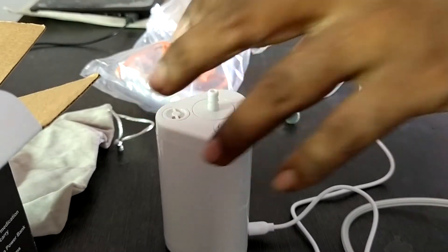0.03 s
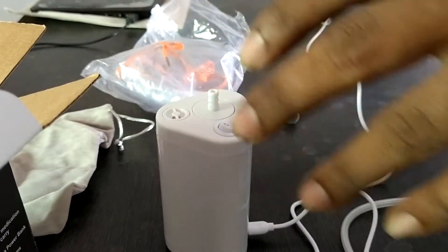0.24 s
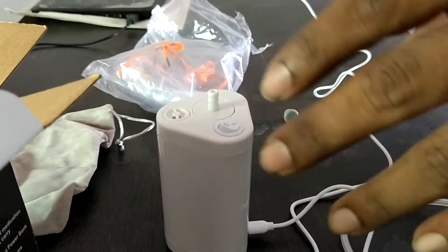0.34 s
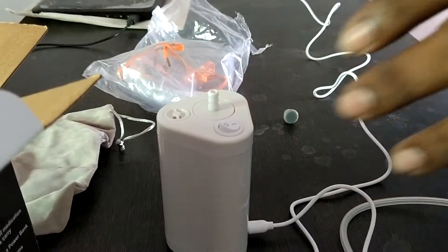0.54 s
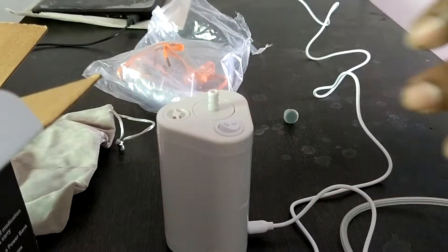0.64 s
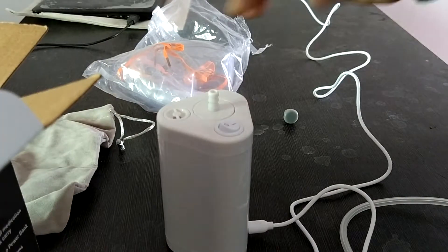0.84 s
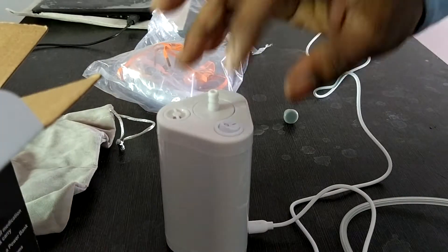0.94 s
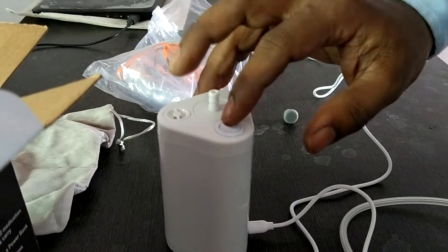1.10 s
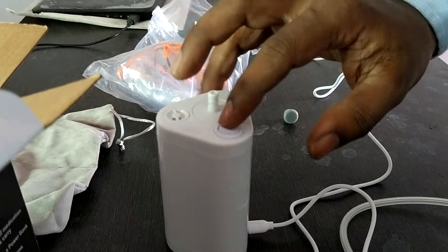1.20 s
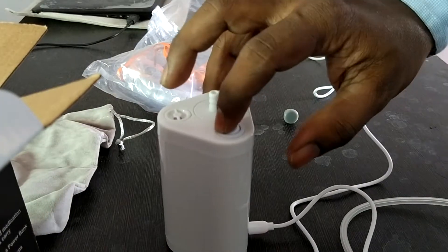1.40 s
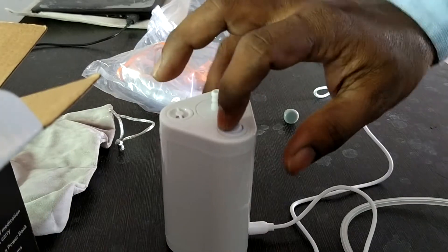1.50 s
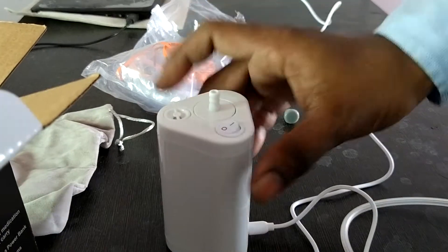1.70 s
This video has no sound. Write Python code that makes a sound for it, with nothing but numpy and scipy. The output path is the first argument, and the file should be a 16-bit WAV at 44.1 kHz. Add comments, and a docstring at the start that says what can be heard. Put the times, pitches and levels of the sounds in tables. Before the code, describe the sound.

Compact compressor close to the microphone in a hard, echoing room: quiet rumble and rustle, a loud snap, a quick motor start, about a second of buzzing, pulsing airflow, then a crisp click and fast wind-down.

```python
"""Small compressor in a bare room

A small compressor on a table in a bare, echoing room: a sharp snap rings out, then the motor spins up. It hums
at multiples of its shaft speed and blows pulsing air, then the button clicks and it coasts down. Hum, thin high
and low tones and rings are sine waves; air, rumble, rustle and clicks are coloured noise. The walls' answer is
fading noise; left and right have unlike treble, and the treble falls away steeply near 12 kHz."""
import sys
import numpy as np
from scipy import signal
from scipy.fft import rfft, irfft, next_fast_len
from scipy.io import wavfile
from scipy.ndimage import map_coordinates

SR = 44100
rng = np.random.default_rng(int(sys.argv[2]) if len(sys.argv) > 2 else 0)


def volts_from_decibels(level):
    """Turn decibel levels (scalar or array-like) into linear amplitude factors."""
    exponent = np.asarray(level, float) / 20
    return 10 ** exponent


def to_wav(sig):
    """Store sig (one row per channel, or 1-D mono) as 16-bit WAV at the path in sys.argv[1].

    Samples outside -1..1 are clipped; the rate is SR.
    """
    pcm = np.clip(np.atleast_2d(sig), -1, 1) * 32767
    pcm = np.round(pcm).astype(np.int16)
    wavfile.write(sys.argv[1], SR, pcm.T)  # frames by channels


N = 77175


def unit(x):
    """Scales a sound to an rms of 1."""
    return x / np.sqrt(np.mean(x ** 2) + 1e-20)


def along(points, hz):
    """Reads a curve of (Hz, value) points, with pitch on a log axis."""
    point_hz, value = np.transpose(points)
    return np.interp(np.log(hz + 1), np.log(point_hz + 1), value)


def curves(rows):
    """Turns each column after the time into one value per sample."""
    time_s, *columns = np.transpose(rows)
    return [np.interp(np.arange(N) / SR, time_s, column) for column in columns]


def wobble(rate):
    """A smooth random curve through a given number of random points a second."""
    knots = rng.standard_normal(int(N * rate / SR) + 4)
    return map_coordinates(knots, [np.arange(N) * rate / SR])


def filtered(x, response):
    """Multiplies the spectrum of a sound by a response that depends on frequency."""
    size = next_fast_len(N + SR // 2)
    spectrum = rfft(x, size) * response(np.fft.rfftfreq(size, 1 / SR))
    return irfft(spectrum, size)[..., :N]


def rush(tone):
    """Stereo noise of rms 1: left and right share nearly the same bass but unrelated treble."""
    # How alike left and right are: pitch_hz, likeness (1 = same, 0 = unrelated)
    likeness = [(60, 0.78), (130, 0.984), (290, 0.92), (640, 0.187), (1400, 0), (15000, 0)]

    def middle_and_side(hz):
        angle = np.arccos(np.clip(along(likeness, hz), -1, 1)) / 2
        return volts_from_decibels(along(tone, hz)) * [np.cos(angle), np.sin(angle)]

    mid, side = filtered(rng.standard_normal((2, N)), middle_and_side)
    return unit(np.array([mid + side, mid - side]))


def walls(x):
    """After a short gap the walls answer with noise in which each frequency dies at its own speed."""
    # How long the echo takes to fall by 60 dB: pitch_hz, fall_s
    echo_fall = [(300, 0.59), (1000, 0.85), (3000, 0.91), (8000, 0.77), (12000, 0.5), (15000, 0.29)]
    first_wall_s, fade_in_s, grain_db = 0.0041, 0.0018, 2.5
    hz, t, bins = signal.stft(rng.standard_normal((2, SR)), SR, nperseg=256)
    fading = volts_from_decibels(-60 * t / along(echo_fall, hz)[:, None])
    tail = signal.istft(bins * fading, SR, nperseg=256)[1]
    length = tail.shape[1]
    tail *= np.clip((np.arange(length) / SR - first_wall_s) / fade_in_s, 0, 1)
    tail *= volts_from_decibels(grain_db * wobble(249.6)[:length])  # an uneven answer
    return signal.fftconvolve(x, tail / np.linalg.norm(tail[0]), axes=1)[:, :N]


def click(bursts, tone, room_db):
    """Short bursts of coloured noise; the walls answer one pulse of the same colour."""
    t = np.arange(N) / SR
    dry = 0
    for peak_s, level_db, rise_s, fall_s in bursts:
        rising = np.minimum((peak_s - t) / rise_s, 9) ** 2
        shape = np.exp(-np.where(t < peak_s, rising, (t - peak_s) / fall_s))
        burst = unit(shape * rush(tone)) * np.sqrt(np.mean(shape ** 2))
        dry = dry + volts_from_decibels(level_db) * burst
    dry = filtered(dry, lambda hz: hz > tone[0][0])  # nothing below the first pitch of the tone
    pulse = np.zeros((2, N))
    pulse[:, round(bursts[0][0] * SR)] = 1
    pulse = unit(filtered(pulse, lambda hz: volts_from_decibels(along(tone, hz))))
    return dry + volts_from_decibels(room_db) * walls(pulse)


def ring(modes):
    """Sine waves that each start at full level and die away, alike in left and right."""
    t = np.arange(N) / SR
    total = 0
    for start_s, pitch_hz, level_db, fall_s in modes:
        since = np.maximum(t - start_s, 0)
        total = total + volts_from_decibels(level_db - 60 * since / fall_s) * np.sin(2 * np.pi * pitch_hz * since)
    return total


def room():
    """Rumble and a faint rustle are coloured noise; thin tones are sine waves of uneven level."""
    # Colour of the rumble: pitch_hz, relative level_db (per Hz)
    rumble_tone = [(15, -60), (30, -50), (50, -31), (75, -6), (100, -11), (170, -9.5), (270, -3.5),
                   (400, -6.5), (560, -14.5), (800, -13.5), (1160, -15.5), (1800, -25.5), (2700, -21.5),
                   (4000, -33.5), (5600, -31), (6100, -21.5), (7900, -34), (9400, -26.5), (12000, -35),
                   (13000, -33), (16000, -60)]
    # Loudness of the rustle: time_s, level_db
    rustle_level = [(0, -53.5), (.08, -56), (.12, -48), (.17, -50.5), (.23, -53), (.5, -73), (1.75, -79.5)]
    # Colour of the rustle: pitch_hz, relative level_db (per Hz)
    rustle_tone = [(800, -7), (1500, -1), (5000, -11), (11900, -18), (12200, -40)]
    # Thin tones of fixed pitch: pitch_hz, left_db, right_db (rms, before the unevenness)
    thin_tones = [(50, -69, -69), (101, -61, -61), (404, -60, -62), (3004, -70, -68), (8441, -68, -70),
                  (9286, -63, -69), (13750, -70, -70)]
    rumble_db, rumble_uneven_db, tone_uneven_db = -47, 1.2, 3.2
    t = np.arange(N) / SR
    tones = 0
    for pitch_hz, left_db, right_db in thin_tones:
        level = np.sqrt(2) * volts_from_decibels([[left_db], [right_db]] + tone_uneven_db * wobble(15.17))
        tones = tones + level * np.sin(2 * np.pi * pitch_hz * t + 1.36 * wobble(45))
    rumble = volts_from_decibels(rumble_db + rumble_uneven_db * wobble(8.0)) * rush(rumble_tone)
    rustle = volts_from_decibels(curves(rustle_level)[0]) * rush(rustle_tone)
    return rumble + rustle + tones


def blurred_tone():
    """A thin 6 kHz sine wave, blurred by a wandering phase; its level comes and goes."""
    # Loudness on the right: time_s, right_db (rms, before the unevenness)
    tone_level = [(0, -57), (.1, -47), (.15, -67), (.22, -47), (.45, -49.5), (.6, -57), (.75, -50),
                  (.87, -56), (.95, -58), (1.05, -52), (1.12, -59.5), (1.2, -53), (1.37, -62), (1.45, -55),
                  (1.6, -66), (1.64, -55.5), (1.75, -57)]
    pitch_hz, blur_rad, uneven_db = 6007, 1.1, 2
    left_under_right_db = -8
    tone = np.sin(2 * np.pi * pitch_hz * np.arange(N) / SR + blur_rad * wobble(60))
    level_db = curves(tone_level)[0] + uneven_db * wobble(29.65) + [[left_under_right_db], [0]]
    return np.sqrt(2) * volts_from_decibels(level_db) * tone


def ticks():
    """Two faint ticks ahead of the snap: short bursts of mostly high noise."""
    # Bursts: peak_s, level_db, rise_s, fall_s
    tick_bursts = [(.097, -51, 0.0029, 0.0052), (.15, -43.5, 0.0029, 0.0043)]
    # Colour: pitch_hz, relative level_db (per Hz)
    tick_tone = [(3000, -35), (7500, -12), (8800, 3), (9400, -8), (10200, -11.5), (12000, -9), (14000, -30)]
    return click(tick_bursts, tick_tone, room_db=-90)


def snap():
    """A sharp snap: noise bursts, a hollow body that rings, and a strong answer from the walls."""
    # Bursts: peak_s, level_db, rise_s, fall_s
    snap_bursts = [(.2379, -14, 0.00228, 0.00025), (.2392, -9, 0.00062, 0.0005),
                   (.242, -29, 0.0026, 0.0066)]
    # Colour: pitch_hz, relative level_db (per Hz)
    snap_tone = [(150, -36), (300, -7), (450, -21), (700, -7), (1000, -15), (1300, -9), (1650, -1.5),
                 (2100, -11.5), (2700, -2.5), (3200, -7.5), (3600, -5), (4500, -11), (5500, -6.5),
                 (6500, -5.5), (8000, -5), (10000, -3), (12000, 2.5), (14000, -11), (16000, -14)]
    # Ringing of the hollow body: start_s, pitch_hz, level_db, fall_s (time to fall 60 dB)
    hollow_body = [(.2372, 384, -47, .025), (.2372, 700, -28.5, 0.019), (.2368, 1900, -45, 0.005)]
    return click(snap_bursts, snap_tone, room_db=-37.5) + ring(hollow_body)


def button():
    """The button's click: noise bursts and the short, high ringing of its plastic cap."""
    # Bursts: peak_s, level_db, rise_s, fall_s
    button_bursts = [(1.4150, -15, 0.0006, 0.0004), (1.4159, -13, 0.0003, 0.0005),
                     (1.4175, -24, 0.0005, 0.0018)]
    # Colour: pitch_hz, relative level_db (per Hz)
    button_tone = [(1000, -53), (1850, -24), (2150, -2.5), (4600, -7.5), (5250, -10), (5900, -13),
                   (7500, 0.5), (9500, -6), (12000, 4), (14000, -6), (16000, -40)]
    # Ringing of the plastic cap: start_s, pitch_hz, level_db, fall_s (time to fall 60 dB)
    plastic_cap = [(1.4148, 2160, -35, .012), (1.4148, 3040, -25, 0.015), (1.4148, 3500, -33, 0.0172),
                   (1.4152, 5100, -31, 0.0096), (1.4152, 7700, -21, 0.0096), (1.4155, 11000, -12, .008)]
    return click(button_bursts, button_tone, room_db=-51.5) + ring(plastic_cap)


def motor_hum(speed, hum_db, turns):
    """Sine waves at multiples of the shaft speed; off full speed the higher ones fade more."""
    # Tones: multiple of the shaft speed, left_db, right_db (rms at full speed, before the case)
    hum_orders = [(3, -52, -50), (4, -39.5, -42.5), (5, -54, -59), (6, -71, -66), (7, -64, -59),
                  (8, -56, -52.5), (10, -70, -71), (11, -62, -63), (12, -62, -61), (14, -67, -66),
                  (15, -68, -59), (16, -61, -60), (17, -74, -69), (18, -67, -64), (19, -65, -69),
                  (20, -59, -61), (21, -61, -61), (22, -66, -68), (23, -68, -62), (24, -57, -57),
                  (25, -60, -63), (27, -58, -59), (30, -60, -61), (31, -57, -56), (33, -60, -62),
                  (34, -61, -64), (35, -60, -68), (36, -64, -69), (37, -59, -63), (38, -65, -69),
                  (41, -70, -68)]
    # What the case lets out, very little of the lowest tones: pitch_hz, gain_db
    case_gain = [(150, -30), (230, -2), (245, 0), (300, 0)]
    waver_db, left_lag_s = .3, .00005  # the waver grows with the log of the multiple
    lag = 2 * np.pi * speed * left_lag_s * [[1], [0]]
    hum = 0
    for order, left_db, right_db in hum_orders:
        waver = waver_db * np.log(order) * wobble(12.16)
        fade = hum_db * (0.5 + .03 * order)
        level = np.sqrt(2) * volts_from_decibels([[left_db], [right_db]] + waver + fade)
        hum = hum + level * np.sin(order * (turns - lag) + rng.uniform(0, 2 * np.pi))
    return filtered(hum, lambda hz: volts_from_decibels(along(case_gain, hz)))


def blown_air(turns):
    """Coloured noise whose strength pulses with the piston, in step with the shaft."""
    # Strength of the airflow: time_s, relative level_db
    airflow = [(.4, -45), (.45, -8), (.49, -1), (.54, 3), (1.415, 2.5), (1.45, -5.5), (1.52, -12),
               (1.62, -25)]
    # Colour: pitch_hz, relative level_db (per Hz)
    air_tone = [(200, -42), (350, -39), (700, -43.5), (1500, -20), (2000, -8), (2330, -32), (2550, -4.5),
                (2900, -16.5), (3600, -21.5), (5500, -22.5), (6300, -35.5), (7000, -9), (7500, -17.5),
                (7950, 5.5), (8400, -2), (9000, -12.5), (9700, -9), (11000, -9.5), (12000, -9),
                (13000, -15.5), (14000, 0.5), (14800, -28.5), (16000, -46)]
    # Pulsing: times a turn, depth (share of the level)
    puffs = [(1, .05), (3, .06), (4, .16)]
    air_db = -41
    pulsing = 1 + sum(depth * np.cos(round(times) * turns) for times, depth in puffs)
    level = volts_from_decibels(air_db + curves(airflow)[0] + 0.32 * wobble(6.2))
    return level * pulsing * rush(air_tone)


def compressor():
    """One unsteady shaft drives both the hum and the pulsing air, and both fill the room."""
    # Spin-up and coasting down: time_s, turns per s, hum_db (scaled for each tone of the hum)
    shaft = [(.44, 55, -34), (.465, 63, -13), (.49, 71.5, -4), (.52, 77.5, -2), (.55, 80.6, 0),
             (.6, 81.78, 0), (1.418, 81.78, 0), (1.44, 68, -6), (1.47, 58, -8), (1.5, 48, -11),
             (1.56, 33, -28)]
    slow_share, fast_share = .001, .0022  # unsteadiness as a share of the speed
    air_room_db, hum_room_db = -7, -21
    speed, hum_db = curves(shaft)
    unsteady = 1 + slow_share * wobble(13.85) + fast_share * wobble(89.1)
    turns = 2 * np.pi * np.cumsum(speed * unsteady) / SR  # shaft angle in radians
    hum = motor_hum(speed, hum_db, turns)
    air = blown_air(turns)
    return hum + air + walls(volts_from_decibels(air_room_db) * air + volts_from_decibels(hum_room_db) * hum)


def scene():
    """All sources together."""
    return compressor() + snap() + button() + ticks() + room() + blurred_tone()


def band_limit(x):
    """A steep low-pass at the top of the band."""
    return signal.sosfilt(signal.butter(12, 16380, fs=SR, output="sos"), x)


def record(dry):
    """Gives left and right unlike treble, lets the treble fall away steeply near 12 kHz, and finishes the mix."""
    # Tone balance of each side: pitch_hz, left_db, right_db
    side_gain = [(100, -0.5, -0.5), (2900, -0.5, -1), (4800, -0.5, 2), (6430, -3.5, 2), (8530, 1.5, -1.5),
                 (9800, 4.5, 0.5), (11114, 2, -7.5), (11530, 7.5, -6), (12145, 6, 0), (12180, -45, -57),
                 (12500, -2, -54), (14500, -4.5, -57), (14360, -2.5, -34.5), (14500, 4.5, -54),
                 (16400, -19, -55)]
    left = [(row[0], row[1]) for row in side_gain]
    right = [(row[0], row[2]) for row in side_gain]
    mix = filtered(dry, lambda hz: volts_from_decibels([along(left, hz), along(right, hz)]))
    return band_limit(mix)


dry = scene()
out = record(dry)
to_wav(out)
```